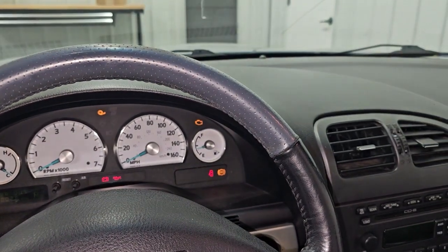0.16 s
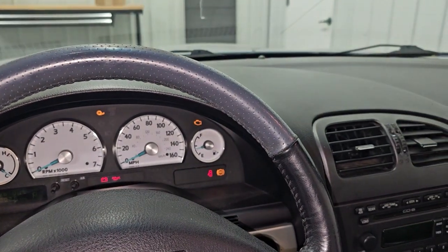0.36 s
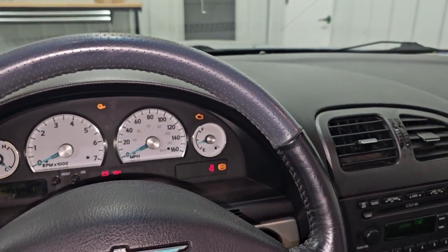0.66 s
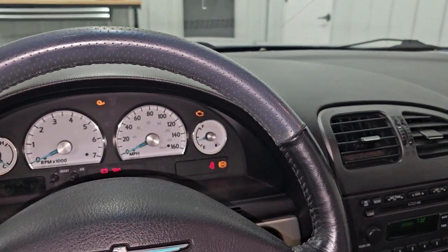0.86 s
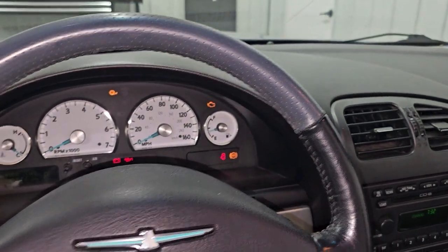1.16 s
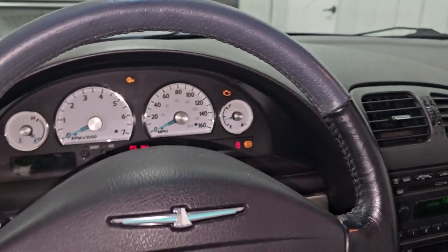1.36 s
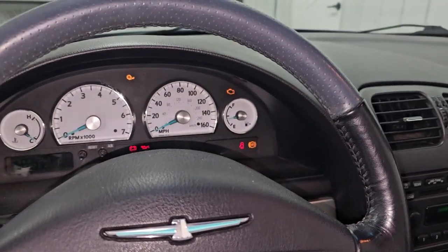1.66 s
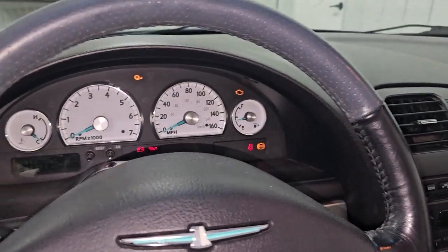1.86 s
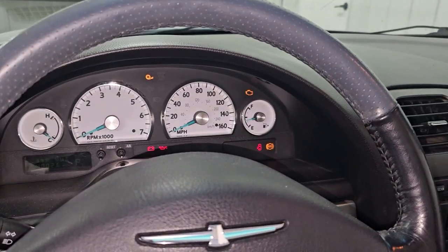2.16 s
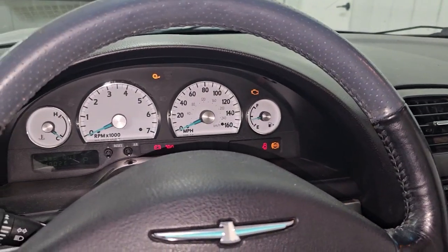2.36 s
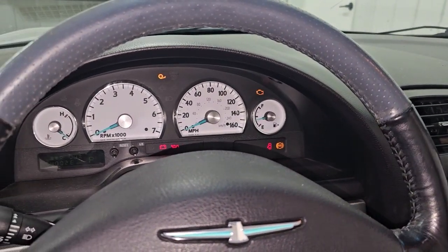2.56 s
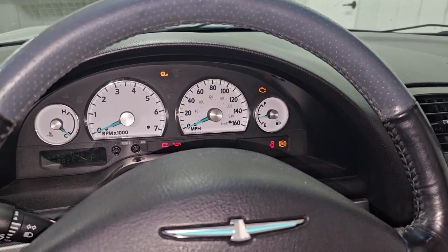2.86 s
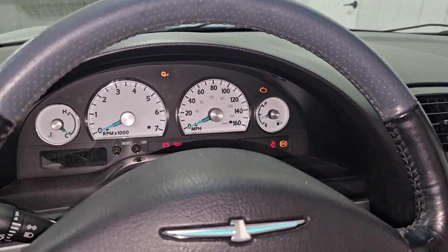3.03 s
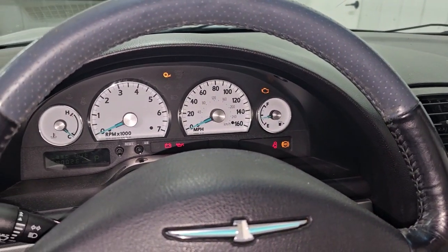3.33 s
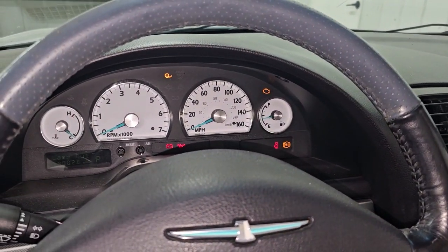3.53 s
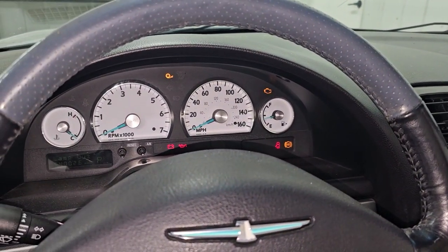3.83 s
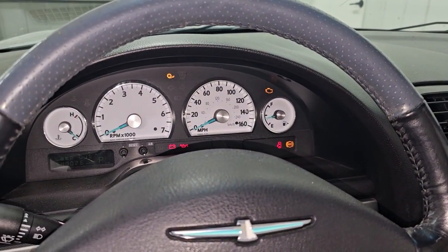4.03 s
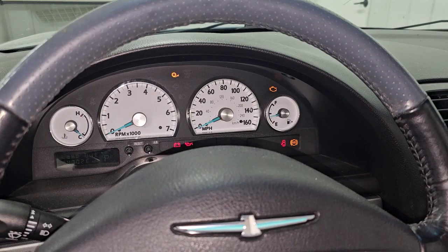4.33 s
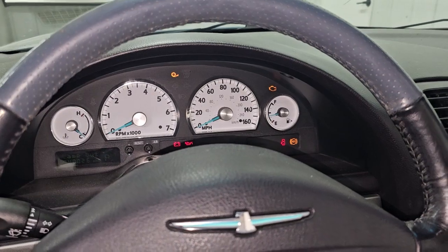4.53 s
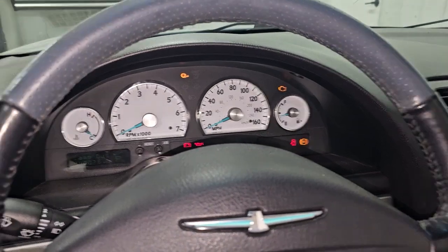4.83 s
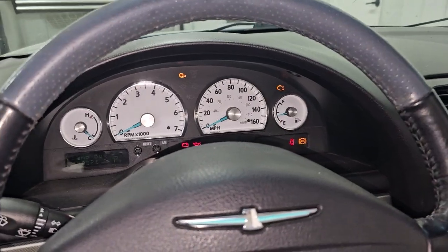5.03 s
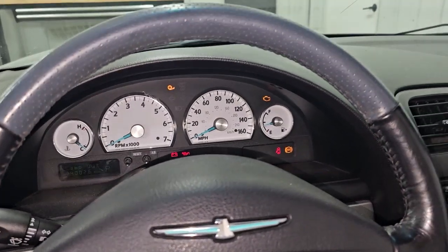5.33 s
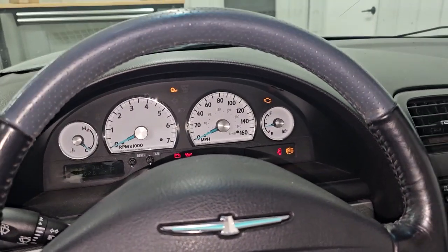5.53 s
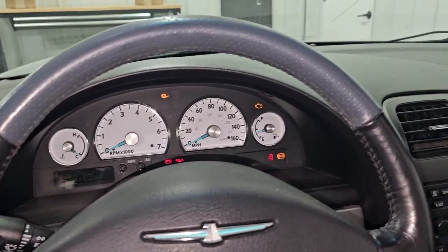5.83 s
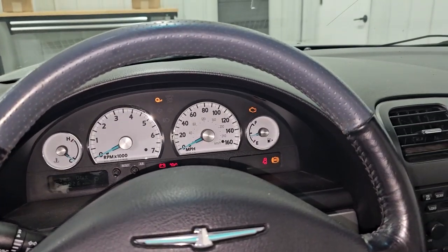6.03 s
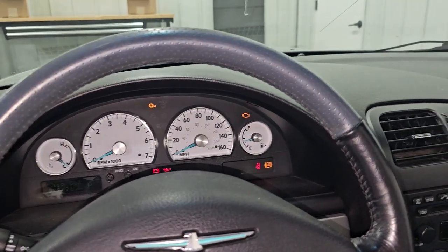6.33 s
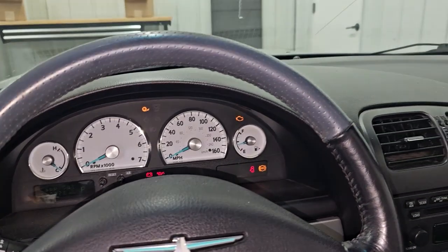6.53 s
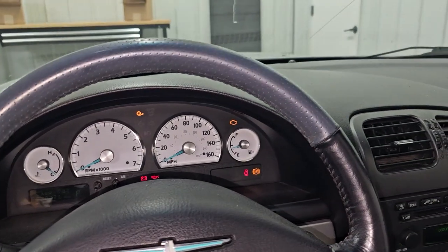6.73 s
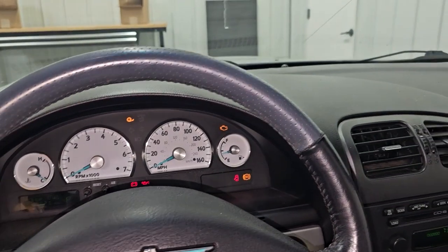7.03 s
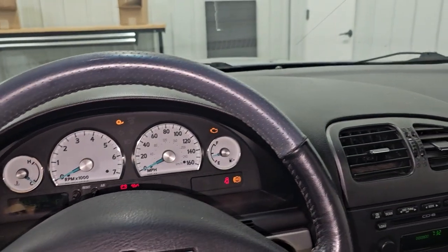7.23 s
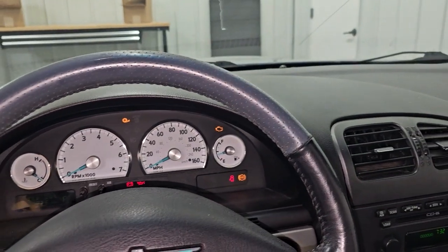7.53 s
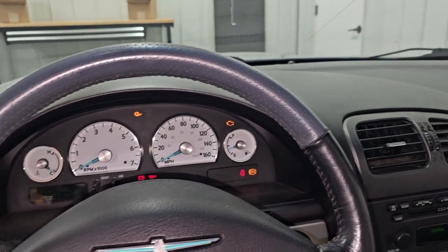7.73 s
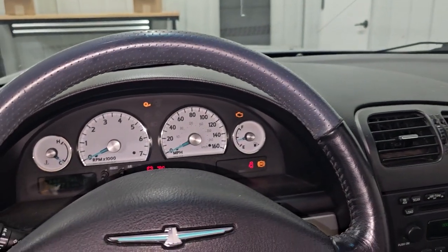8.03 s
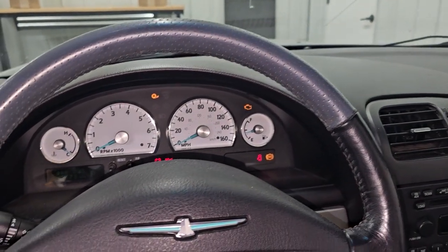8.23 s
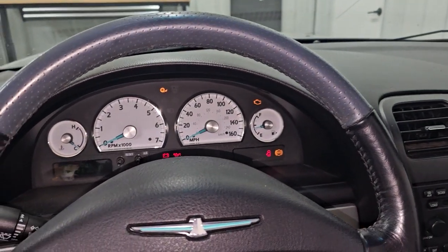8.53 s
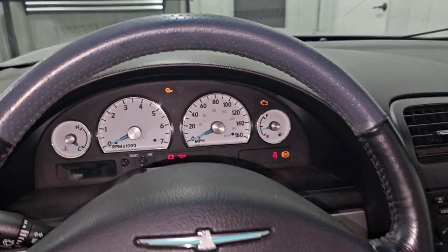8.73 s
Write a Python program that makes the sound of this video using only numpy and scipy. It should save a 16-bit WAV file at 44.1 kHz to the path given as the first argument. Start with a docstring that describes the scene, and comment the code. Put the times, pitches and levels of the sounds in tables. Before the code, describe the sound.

Close inside a parked car in a quiet garage: a sleeve rubs softly and trim ticks faintly. A plastic switch snaps sharply, then again more softly. After a lull, cloth slides and the steel door latch clacks among hollow trim knocks. Near the end the door shuts with a deep, heavy thunk that booms through the cabin and overloads the microphone, leaving a brief tail and quiet hum.

```python
"""Car door shut in a garage

Inside a parked car a sleeve rustles, a switch clicks twice among fainter ticks, the door latch is worked
and the trim knocks. Then the door is pulled shut: the latch catches, the panel and the cabin air boom, and
the thunk overloads the microphone. Contacts are decaying noise bands and sine modes; cloth, leather
and the quiet garage are coloured noise under moving gains.
"""
import sys
import numpy as np
from scipy import signal
from scipy.fft import rfft, irfft, next_fast_len
from scipy.io import wavfile
from scipy.ndimage import uniform_filter1d, map_coordinates

SR = 44100
rng = np.random.default_rng(int(sys.argv[2]) if len(sys.argv) > 2 else 0)


def waveform_to_disk(signal):
    """Save audio, clipped to [-1, 1], as 16-bit WAV at the path in sys.argv[1]."""
    frames = np.transpose(np.atleast_2d(signal))
    scaled = np.clip(frames, -1, 1) * 32767
    samples = np.round(scaled).astype(np.int16)
    wavfile.write(sys.argv[1], SR, samples)


N = 392181  # samples

# All table levels are relative: each is mixed further below. t60 is the time to fall by 60 dB.


def amp(db):
    """Decibels to gain."""
    return 10 ** (np.asarray(db) / 20)


def unit(x):
    """x at rms 1."""
    return x / np.sqrt(np.mean(x ** 2) + 1e-20)


def along(points, hz):
    """(Hz, value) points read on a log frequency axis."""
    f, v = np.transpose(points)
    return np.interp(np.log(hz + 1), np.log(f + 1), v)


def wobble(knots_per_s):
    """A smooth random curve through normally distributed knots."""
    knots = rng.standard_normal(int(N * knots_per_s / SR) + 4)
    return map_coordinates(knots, [np.arange(N) * knots_per_s / SR])


def filtered(x, response):
    """x times a response of frequency, padded by half a second."""
    size = next_fast_len(N + SR // 2)
    hz = np.fft.rfftfreq(size, 1 / SR)
    return irfft(rfft(x, size) * response(hz), size)[..., :N]


def noise(spectrum):
    """Steady coloured noise of rms 1."""
    return unit(filtered(rng.standard_normal(N), lambda hz: amp(along(spectrum, hz))))


def swells(rows):
    """A gain curve of swells, each with a bell-shaped rise and fall; overlapping ones add in power."""
    t = np.arange(0, N, 64) / SR
    power = np.zeros(len(t))
    for s, rise_s, fall_s, db in rows:
        bell = np.exp(-((t - s) / np.where(t < s, rise_s, fall_s)) ** 2)
        power += (amp(db) * bell) ** 2
    return np.interp(np.arange(N) / SR, t, np.sqrt(power))


def strike(x):
    """x scaled so that its loudest 10 ms have rms 1."""
    return x / np.sqrt(uniform_filter1d(x * x, SR // 100).max() + 1e-20)


def burst(spectrum, decay, life=1, size=32768, count=10):
    """Countless close modes struck at once: octave bands of noise, each dying at its own speed."""
    t, hz = np.arange(size) / SR, np.fft.rfftfreq(size, 1 / SR)
    centres_hz = 32 * 2. ** np.arange(count)
    share = np.clip(1 - abs(np.log2((hz + 1) / centres_hz[:, None])), 0, 1)
    bands = irfft(share * amp(along(spectrum, hz)) * rfft(rng.standard_normal(size)))
    # low modes need part of a cycle to start
    rise = 1 - np.exp(-t * np.minimum(2 * centres_hz, 2000)[:, None])
    t60_s = np.maximum(along(decay, centres_hz) * life, .005)
    fade = np.exp(-np.log(1000) * t / t60_s[:, None])
    return strike((bands * rise * fade).sum(0))


def ring(modes, scatter_db, detune, life=1, size=32768):
    """The strong modes of a part; every blow shares its force out among them anew."""
    t = np.arange(size) / SR
    hz, db, t60_s = np.transpose(modes)[:, :, None]
    level, pitch = rng.standard_normal((2, len(modes), 1))
    sign = rng.choice([-1, 1], (len(modes), 1))
    gain = sign * amp(db + scatter_db * level)
    fade = np.exp(-np.log(1000) * t / np.maximum(t60_s * life, .005))
    return strike((gain * fade * np.sin(2 * np.pi * hz * (1 + detune * pitch) * t)).sum(0))


def add(track, s, sound):
    """Lay a sound into the track at time s."""
    part = track[round(s * SR):][:len(sound)]
    part += sound[:len(part)]


# Contacts of the closing door: latch, seal, air cushion, landing.
# Each row: start in seconds, panel level in dB, boom level in dB, rattle level in dB.
DOOR_CONTACTS = [(7.8225, -11, -36.5, -38.5), (7.839, -13.5, -16, -25.5), (7.856, -42.5, -16.5, -47.5),
                 (7.875, -7.5, -13.5, -20.5)]
# First shudder on the seal: panel, boom and rattle level in dB.
SHUDDER_DB = [-10, -14.5, -29.5]
# Fade of the shudders: panel, boom and rattle in dB per second.
SHUDDER_FADE_DB_PER_S = [135.5, 122, 120]
SHUDDER_INTERVAL_S, SHUDDER_JITTER_S = .031, .002


def shudders(count=11):
    """The landed door's dying blows on its seal as (s, panel dB, boom dB, rattle dB)."""
    first_s = DOOR_CONTACTS[-1][0] + SHUDDER_INTERVAL_S
    ages_s = SHUDDER_INTERVAL_S * np.arange(count) + SHUDDER_JITTER_S * rng.standard_normal(count)
    fade = np.array(SHUDDER_FADE_DB_PER_S)
    return [(first_s + age_s, *(np.array(SHUDDER_DB) - age_s * fade)) for age_s in ages_s]


# Door panel resonances. Each row: frequency in Hz, level in dB, t60 in seconds before scaling.
PANEL_MODES = [(236, -14.5, 0.45), (273, 0.5, .3), (298.7, 2, .2), (401, -6.5, 0.242), (507, 9, 0.083),
               (564, -1, 0.16), (660, -18.5, 0.17), (726, -12.5, 0.21), (807.5, 0.5, 0.11), (876, -9.5, .2),
               (1170, -16, .16), (1700, -17.5, 0.1)]
# Cabin air and roof resonances. Each row: frequency in Hz, level in dB, t60 in seconds.
CABIN_MODES = [(38.2, -20, .4), (59.2, -1, .55), (78.6, -1, 0.56), (97.4, -4.5, 0.396), (114.6, 1.5, .4),
               (143.8, 0.5, 0.47), (174.4, -5, 0.37), (226, -7, 0.24), (275.7, -8.5, 0.35),
               (305.2, -7, 0.3)]
# Colours of sheet metal, boom and rattling fittings. Each row: frequency in Hz, density in dB per Hz.
SHEET_COLOUR = [(100, -10), (250, 5), (550, 4.5), (850, 4), (1300, -2.5), (2200, -23.5), (4000, -54),
                (9000, -71)]
BOOM_COLOUR = [(20, -38.5), (40, -14), (70, -2), (150, 0), (300, -3.5), (500, -12), (1200, -56)]
RATTLE_COLOUR = [(500, -16), (1100, 4.5), (1600, -1), (2150, 2.5), (2500, -6), (3400, -6), (6000, -10),
                 (9000, -18.5), (12000, -21), (15000, -20.5)]
# Decay of the door. Each row: frequency in Hz, t60 in seconds before scaling.
DOOR_DECAY = [(60, 0.33), (250, 0.39), (800, 0.17), (3000, 0.37), (7000, 0.27), (14000, 0.12)]
STRIKER_S, STRIKER_DB = 7.8225, -13.5
SEAL_S, SEAL_DB, SEAL_RISE_S = 7.84, -5, 0.024
SURGE_S, SURGE_DB, SURGE_WIDTH_S = 7.865, -1, 0.0038


def door():
    """Latch catches, door lands and shudders on its seal: panel rings, cabin booms, fittings rattle."""
    out = np.zeros(N)
    for s, panel_db, boom_db, rattle_db in DOOR_CONTACTS + shudders():
        panel = amp(-6) * ring(PANEL_MODES, scatter_db=1.0, detune=0.0015)
        panel += amp(-7.5) * burst(SHEET_COLOUR, DOOR_DECAY, life=0.52)
        boom = burst(BOOM_COLOUR, DOOR_DECAY, life=0.81)
        rattle = burst(RATTLE_COLOUR, DOOR_DECAY, life=0.48)
        add(out, s, amp(panel_db) * panel + amp(boom_db) * boom + amp(rattle_db) * rattle)

    # the striker meets the latch: a hard clunk with no bass
    clunk_colour = [(300, -31), (520, 4.5), (820, 1), (1150, -13.0), (2000, -15.5), (2600, -44.0),
                    (9000, -51.5)]
    add(out, STRIKER_S, amp(STRIKER_DB) * burst(clunk_colour, [(800, 0.11)]))

    # the seal squeezes the trapped air, so its modes build up over a few cycles
    air = ring(CABIN_MODES, scatter_db=.4, detune=.002)
    build_up = 1 - np.exp(-np.arange(len(air)) / SR / SEAL_RISE_S)
    add(out, SEAL_S, amp(SEAL_DB) * strike(air * build_up))

    # as the seal shuts, the pressure dips, surges once and dips again
    u = (np.arange(N) / SR - SURGE_S) / SURGE_WIDTH_S
    surge = (1 - 2 * u ** 2) * np.exp(-u ** 2)
    return out + amp(SURGE_DB) * surge


# Contacts in the door latch. Each row: start in seconds, level in dB, crack t60 in seconds before scaling.
LATCH_CONTACTS = [(5.8128, -24.5, 0.093), (5.8234, -35.5, 0.021), (5.8374, -23, 0.11), (5.8454, -16, 0.087),
                  (5.8517, -10.5, 0.065), (5.9399, -28.5, 0.043), (5.9564, -32.5, 0.44),
                  (6.5088, -29, 0.043), (6.512, -6, 0.05), (6.5505, -11, 0.1)]
# Steel resonances. Each row: frequency in Hz, level in dB, t60 in seconds.
STEEL_MODES = [(2694, -13.5, .05), (3436, -9.5, .07), (4900, -19.5, 0.042), (6260, -2, 0.032),
               (9157, -28, 0.053), (9400, -29.5, 0.073), (11800, -27, 0.055), (13790, -36, 0.11),
               (14400, -15.5, 0.04), (15640, -31, 0.05)]
# Colours of the crack and of a hard contact's first instant. Each row: frequency in Hz, density in dB per Hz.
CRACK_COLOUR = [(880, -27), (1500, -0.5), (2230, -10), (2720, 2), (3030, -10), (3410, 3.5), (4040, -12.5),
                (4970, -1), (5540, -11), (6180, -3.5), (10300, -10.5), (14300, -14.5), (16000, -25)]
SPIKE_COLOUR = [(500, -12), (1500, -1), (4000, -2), (7000, 0.5), (11000, -3), (14500, 3), (16000, 0)]


def latch():
    """Steel parts of the latch meet with a spike, a crack and a short ring."""
    out = np.zeros(N)
    for s, db, t60_s in LATCH_CONTACTS:
        crack = burst(CRACK_COLOUR, [(2000, 1.1), (15000, 0.57)], life=t60_s)
        steel = ring(STEEL_MODES, scatter_db=2, detune=.002)
        spike = burst(SPIKE_COLOUR, [(1000, .016)])
        add(out, s, amp(db - 11.5) * crack + amp(db - 19.5) * steel + amp(db - 14.0) * spike)
    return out


# Knocks on the trim.
# Each row: start in seconds, thud level in dB, clack in dB relative to that level, number of rebounds.
TRIM_KNOCKS = [(.683, -36.5, -7, 0), (.717, -31.5, -11.5, 0), (.929, -39.5, -5.5, 0),
               (.974, -31.5, -4.5, 0), (1.367, -35, -4, 0), (2.032, -43, -6, 0), (2.265, -39, -4.5, 0),
               (2.825, -18, -14, 0), (3.185, -26, -28.5, 0), (3.216, -23.5, -26, 0), (3.597, -36, -23.5, 0),
               (5.482, -21.5, -4.5, 2), (5.737, -16, -29.5, 0), (5.822, -15.5, -9.5, 0), (5.85, -11, -6, 1),
               (5.9295, -5, -10.5, 1), (6.055, -28.5, 0.5, 0), (6.131, -30.5, -3, 0), (6.17, -28, -12.5, 1),
               (6.222, -29, -15.5, 0), (6.432, -31, -3.5, 0), (6.512, -16, -4, 0), (6.5514, -5.5, -6.5, 1),
               (6.836, -38.5, -20, 0), (7.23, -36.5, -16.5, 0), (7.653, -46.5, -3, 0),
               (7.8, -32.5, -5.5, 0), (8.047, -19.5, -13, 0), (8.216, -42.5, -0.5, 0)]
REBOUND_S, REBOUND_LOSS_DB = .021, 3.5


def rebounds():
    """Loose trim strikes again, weaker each time: every blow as (s, thud dB, clack dB)."""
    blows = []
    for s, db, clack_db, again in TRIM_KNOCKS:
        for k in range(round(again) + 1):
            blows.append((s + k * REBOUND_S, db - k * REBOUND_LOSS_DB, clack_db))
    return blows


# Trim resonances. Each row: frequency in Hz, level in dB, t60 in seconds before scaling.
TRIM_MODES = [(183.6, -18.5, .16), (227.7, -5, .16), (295.4, 0.5, 0.11), (366.5, -5.5, 0.076),
              (446.7, -6.5, 0.22), (580, -4.5, 0.08), (716, -4, 0.087)]
# Colours of thud and clack. Each row: frequency in Hz, density in dB per Hz.
THUD_COLOUR = [(30, -31.5), (70, -18.5), (150, -10), (230, -3), (400, -0.5), (620, -11.5), (900, -23),
               (2000, -59.5)]
CLACK_COLOUR = [(350, -21.5), (600, 5.5), (850, 3.5), (1400, -3), (2200, -11.5), (3500, -15.5),
                (7000, -27.5), (16000, -46.5)]
# Decay of the trim. Each row: frequency in Hz, t60 in seconds before scaling.
TRIM_DECAY = [(80, 0.65), (300, 0.088), (800, .09), (2500, 0.062), (10000, .04)]
LIFE_DB_PER_FORCE_DB, LIFE_DB_PER_CLACK_DB = 0.14, 0.071  # weak or soft contacts ring shorter


def knocks():
    """Hollow trim thuds when bumped; a soft contact dulls the thud, a hard one adds a clack."""
    out = np.zeros(N)
    upper_panel = [mode for mode in PANEL_MODES if mode[0] > 480]
    for s, db, clack_db in rebounds():
        life = amp(LIFE_DB_PER_FORCE_DB * db + LIFE_DB_PER_CLACK_DB * clack_db)
        thud = amp(-5.5) * burst(THUD_COLOUR, TRIM_DECAY, life)
        thud += amp(-6.0) * ring(TRIM_MODES, scatter_db=3.5, detune=0.025, life=life)
        corner_hz = np.clip(1100 * amp(0.33 * clack_db), 300, 2000)
        dull = signal.butter(4, corner_hz, fs=SR, output="sos")
        thud = strike(signal.sosfilt(dull, thud))
        clack = amp(-6.5) * burst(CLACK_COLOUR, TRIM_DECAY, life)
        clack += amp(-8.5) * ring(upper_panel, scatter_db=6.0, detune=0.037, life=0.52 * life)
        add(out, s, amp(db - 7.5) * thud + amp(db + clack_db) * clack)
    return out


# Switch clicks and tiny ticks.
# Each row: start in seconds, body level in dB, t60 in seconds before scaling, contact spike level in dB.
SWITCH_CLICKS = [(1.367, -46, .05, -60), (2.8226, -11, 0.084, -31), (3.182, -23.5, 0.11, -51),
                 (3.1854, -22, 0.049, -43), (4.304, -49.5, 0.029, -77), (7.14, -48, .04, -73),
                 (7.2227, -40, .049, -40.5), (7.265, -38.5, 0.057, -37.5)]
# Switch resonances. Each row: frequency in Hz, level in dB, t60 in seconds before scaling.
TOGGLE_MODES = [(1345, -11, .07), (4360, 5, 0.057), (4425, -10.5, .05), (5780, 1, .045),
                (6570, -2.5, 0.051), (6911, 2.5, 0.082), (14440, -4, .035)]
# Colour of the snap. Each row: frequency in Hz, density in dB per Hz.
SNAP_COLOUR = [(600, -27), (1350, -6.5), (2100, -19), (3200, -7.5), (4300, 2), (5400, -3.5), (6900, 0),
               (9900, -8.5), (12500, -9), (14900, -8), (16000, -9)]


def switch():
    """A sprung plastic switch snaps over: a sharp spike, then a bright crack with a trace of ring."""
    out = np.zeros(N)
    for s, db, t60_s, spike_db in SWITCH_CLICKS:
        crack = burst(SNAP_COLOUR, [(1500, 1.4), (6000, 0.47), (15000, 1.03)], life=t60_s)
        spring = ring(TOGGLE_MODES, scatter_db=1.5, detune=.01, life=t60_s / .2)
        spike = burst(SPIKE_COLOUR, [(1000, 0.0061)])
        add(out, s, amp(db - 10.5) * crack + amp(db - 15.5) * spring)
        add(out, s, amp(spike_db) * spike)
    return out


# Strokes of a sleeve over the seat.
# Each row: peak in seconds, rise in seconds, fall in seconds, rub in dB, fizz in dB, scuff in dB.
SLEEVE_STROKES = [(.72, 0.13, 0.28, -54.5, -56.5, -50.5), (.98, 0.056, 0.033, -48, -45.5, -44),
                  (1.11, 0.13, 0.16, -50.5, -52.5, -53), (1.47, 0.27, 0.24, -51, -57, -56.5),
                  (1.785, 0.026, 0.014, -55, -55, -69), (2.08, 0.9, 0.19, -55.5, -63, -57),
                  (2.4, 0.1, 0.079, -59, -60, -58), (2.62, 0.22, 0.1, -60, -76, -57.5),
                  (4.7, 0.74, 0.12, -59.5, -65.5, -69), (5.19, 0.06, .11, -38, -45.5, -54),
                  (5.42, 0.39, 0.19, -42.5, -54.5, -49.5), (5.73, 0.058, 0.048, -46, -42, -62),
                  (6.08, 0.61, 0.32, -54, -64, -48), (6.52, 0.13, .2, -53, -55, -57),
                  (6.9, 0.12, .12, -76, -67.5, -56.5), (7.19, 0.092, 0.13, -56.5, -76, -54),
                  (7.77, 0.098, 0.11, -57, -74, -69.5), (8.27, .05, .04, -78, -70, -72),
                  (8.87, .16, .1, -57, -78.5, -70.5)]
# Colours of rub, fizz and pressed cloth. Each row: frequency in Hz, density in dB per Hz.
CLOTH_COLOUR = [(60, -9), (200, 4.5), (450, -2), (900, -4), (1400, -4.5), (2200, -6), (3500, -6.5),
                (6000, -14), (11000, -28.5), (14300, -21.5), (16000, -24)]
FIZZ_COLOUR = [(2000, -22), (4500, -0.5), (7000, -2), (11500, -5.5), (14500, -2.5), (16000, -2)]
SCUFF_COLOUR = [(30, -4.5), (80, 9.5), (180, 2.5), (350, -3), (700, -7), (1100, -12), (1800, -35),
                (5000, -29), (16000, -47.5)]


def sleeve():
    """Cloth slides on leather: soft rub, fine fizz, duller scuffs where it presses; all catch unevenly."""
    grip = amp(0.69 * wobble(25) + 1.4 * wobble(300))
    rub_gain, fizz_gain, scuff_gain = [
        swells([(*row[:3], row[column]) for row in SLEEVE_STROKES]) for column in (3, 4, 5)]
    rub = rub_gain * noise(CLOTH_COLOUR)
    fizz = fizz_gain * noise(FIZZ_COLOUR)
    scuff = scuff_gain * noise(SCUFF_COLOUR)
    return grip * (amp(-4) * rub + fizz + amp(1.3 * wobble(60)) * scuff)


# Weight shifting in the seat, then leather chafing in a narrow band.
# Each row: peak in seconds, rise in seconds, fall in seconds, level in dB.
WEIGHT_SHIFTS = [(.98, 0.039, 0.058, -47), (2.3, 0.1, .07, -50), (5.5, .26, 0.2, -52.5),
                 (5.96, .06, .08, -31.5), (6.17, .085, 0.077, -50)]
LEATHER_CHAFES = [(2.29, 0.033, 0.17, -62.5), (2.6, 0.078, 0.078, -62.5)]


def seat():
    """Shifting weight rumbles through the car's body and makes the leather chafe."""
    rumble = noise([(20, -22.5), (45, -2.0), (80, -1.5), (120, -7.5), (200, -11.0), (400, -50)])
    leather = noise([(700, -19), (1100, 3), (1350, 3), (1600, -13), (2300, -12), (3000, -30), (8000, -45)])
    chafe = swells(LEATHER_CHAFES) * amp(3.4 * wobble(70)) * leather
    return swells(WEIGHT_SHIFTS) * rumble + chafe


def bumps(count=60):
    """Faint soft bumps of someone shifting about, at chance moments: short, dulled trim rings."""
    out = np.zeros(N)
    for when, force in rng.random((count, 2)):
        bump = ring(TRIM_MODES, scatter_db=5.0, detune=0.14, life=0.34, size=8192)
        add(out, when * N / SR, amp(-59 + 10.0 * force) * bump)
    return signal.sosfilt(signal.butter(3, 560, fs=SR, output="sos"), out)


# Decay of the garage. Each row: frequency in Hz, t60 in seconds.
GARAGE_DECAY = [(100, 0.61), (500, 0.37), (2000, 0.65), (6000, 0.57), (14000, .36)]


def garage(x):
    """A faint tail from the walls around the car: x convolved with a noise burst, 10 ms late."""
    tail = burst([(60, 1.5), (400, 0), (3000, -3), (15000, -7.5)], GARAGE_DECAY)
    delayed = np.pad(x, (SR // 100, 0))
    return signal.fftconvolve(delayed, tail / np.linalg.norm(tail))[:N]


# Colours of the faint hiss and of the drone. Each row: frequency in Hz, density in dB per Hz.
QUIET_COLOUR = [(12, -51.5), (20, -23.5), (36, -6), (60, 0), (130, -13.5), (154, -11), (193, -12),
                (337, -28), (388, -17.5), (698, -26.5), (2390, -41.5), (3440, -34.5), (12100, -43.5),
                (14300, -40), (16000, -52.5)]
HUM_COLOUR = [(35, -41), (48, -14.5), (57, 4.5), (66, -11), (90, -45.5)]


def background():
    """The quiet garage: a low wavering drone, a restless murmur of air and a faint hiss."""
    drone = amp(-64 + 1.5 * wobble(1.8)) * noise(HUM_COLOUR)
    murmur = noise([(100, -27.5), (220, -5), (480, -0.5), (700, -12.0), (1300, -10.5), (1800, -29.0)])
    air = amp(-67.5 + wobble(15)) * murmur
    quiet = amp(-57 + .7 * wobble(21)) * noise(QUIET_COLOUR)
    return quiet + drone + air


def scene():
    """Everything leans left, the background most of all; a faint even hiss lies under it."""
    slam, clatter, clicks = door(), latch() + knocks(), switch()
    echo = garage(amp(-19) * slam + amp(-18.5) * clatter + amp(-24.5) * clicks)
    near = slam + clatter + clicks + seat() + echo
    far = background() + bumps()
    hiss = amp(-85.5) * np.array([noise(FIZZ_COLOUR), noise(FIZZ_COLOUR)])
    # pan gains in dB: left, right
    return near * amp([[2.5], [-3.5]]) + sleeve() * amp([[2.8], [-4.5]]) + far * amp([[4], [-8]]) + hiss


BAND_LIMIT_HZ = 16200


def squash(x, limit):
    """Smooth saturation: nearly linear when quiet, flattening towards the limit."""
    return x / (1 + abs(x / limit) ** 6) ** (1 / 6)


def record(dry):
    """The microphone flattens the thunk's peaks, sheds the deepest bass and stops at its band limit."""
    top = amp([[0], [-6]])  # the right channel flattens 6 dB lower
    loaded = squash(dry, top * amp(-.5))
    coupled = signal.sosfilt(signal.butter(2, 28, "highpass", fs=SR, output="sos"), loaded)
    flattened = squash(coupled * amp(.8), top * amp(.8))
    return filtered(flattened, lambda hz: 1 / (1 + (hz / BAND_LIMIT_HZ) ** 120))


dry = scene()
out = record(dry)
waveform_to_disk(out)
```